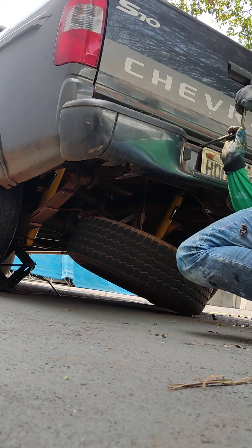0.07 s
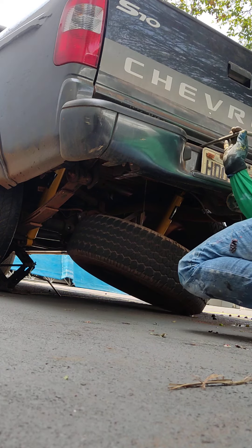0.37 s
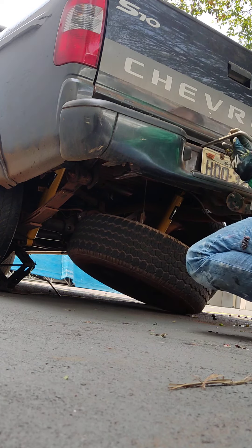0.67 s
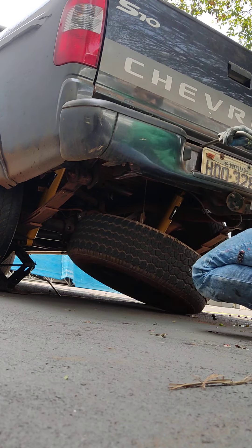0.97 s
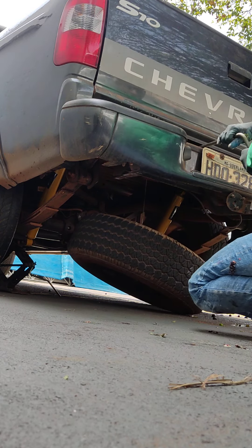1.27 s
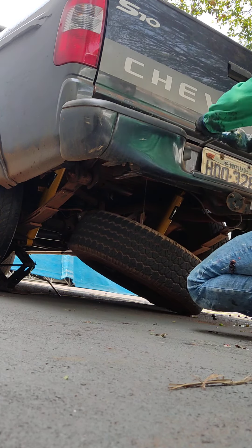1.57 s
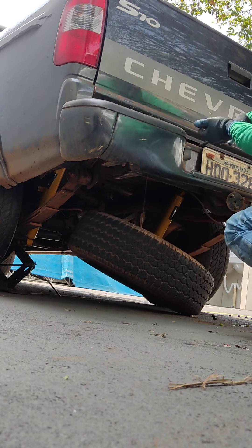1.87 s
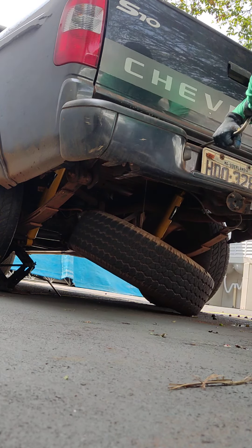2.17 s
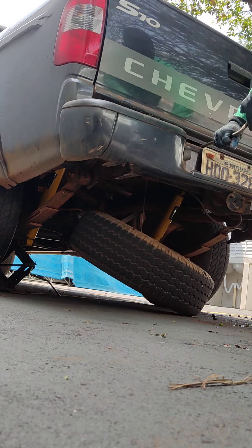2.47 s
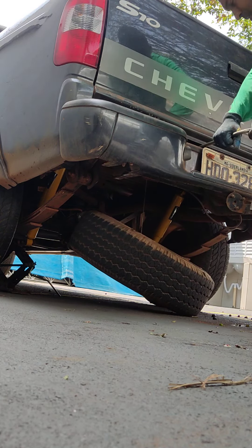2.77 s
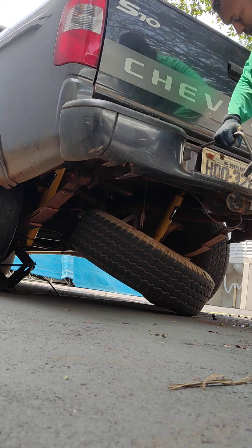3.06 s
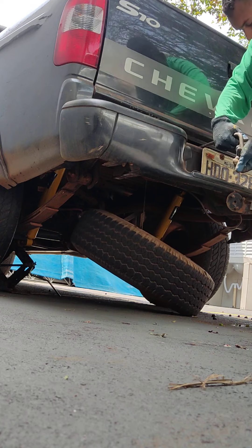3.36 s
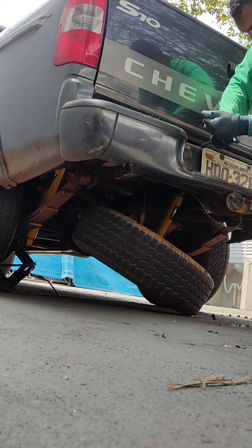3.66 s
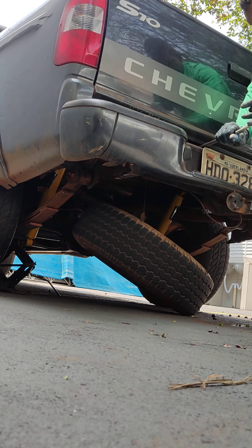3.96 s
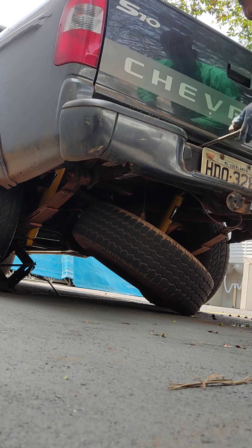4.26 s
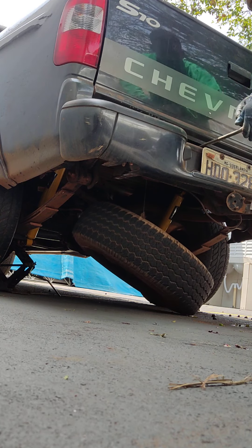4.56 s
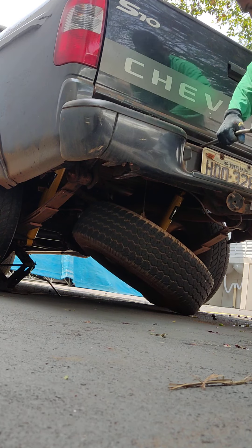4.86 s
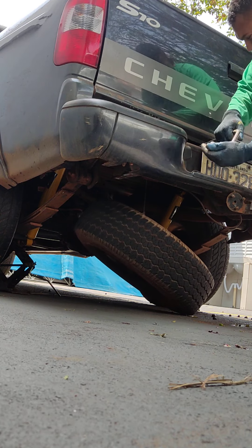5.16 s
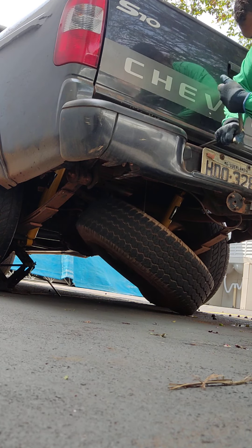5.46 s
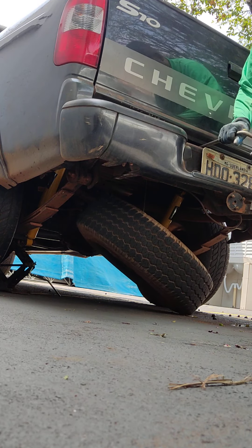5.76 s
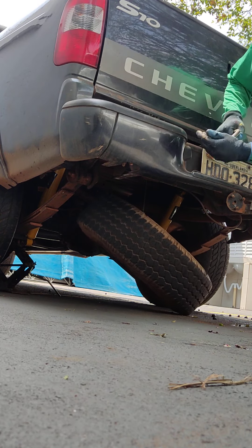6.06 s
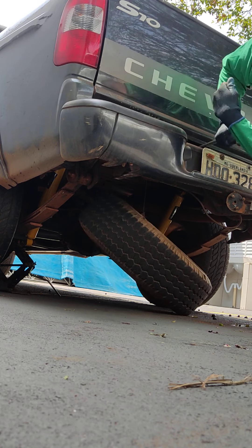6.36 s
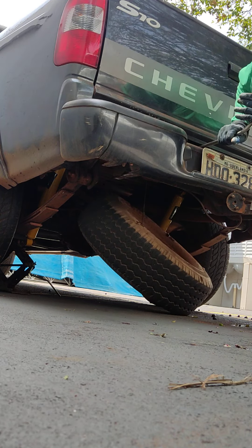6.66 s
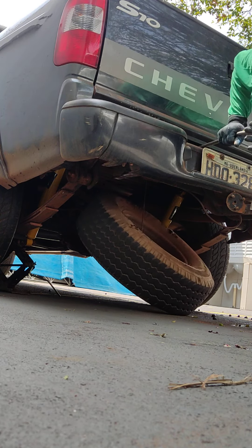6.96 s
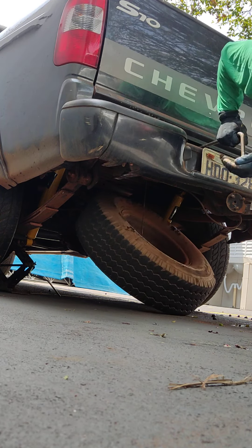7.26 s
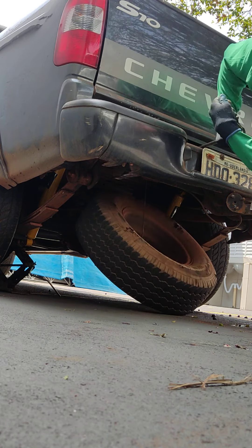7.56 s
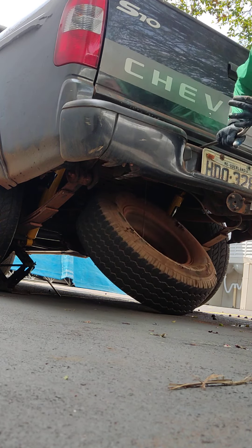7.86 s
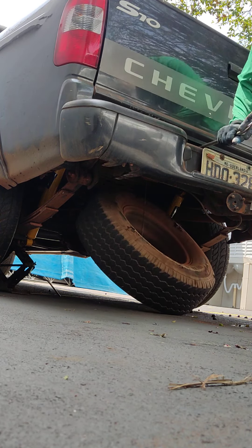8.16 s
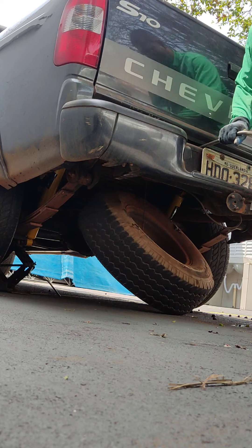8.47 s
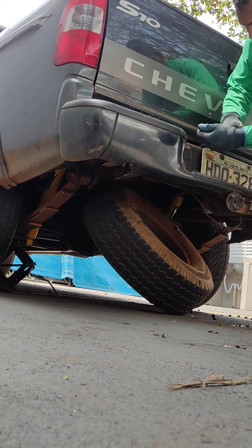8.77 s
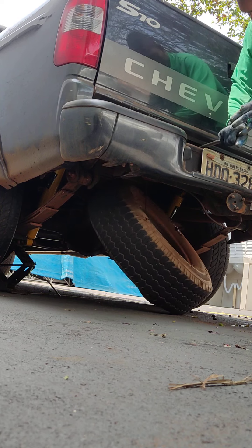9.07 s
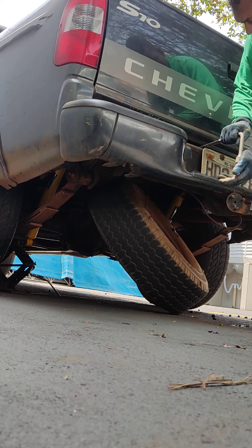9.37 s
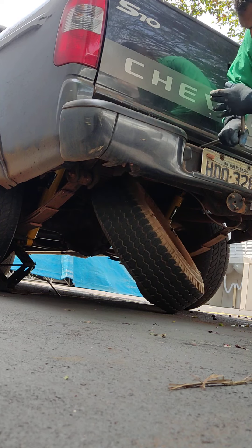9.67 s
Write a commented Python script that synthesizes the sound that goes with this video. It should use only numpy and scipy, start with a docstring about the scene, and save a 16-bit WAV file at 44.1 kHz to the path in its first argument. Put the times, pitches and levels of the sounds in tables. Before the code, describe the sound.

A steady low hum, a faint wavering drone and distant traffic run throughout, outdoors by a pickup's tailgate. A steel rod cranks the spare tyre winch, with soft tyre dragging and glove rustle underneath. After a few light clicks, a booming knock lands at 1.2 seconds, then a cluster of ringing metal knocks and wheel bumps rattles the chassis until 2.7, sharpest at 1.75, with a short squeak near 2.4. Small clinks follow around 3 to 3.8 seconds, and brief scuffs come at 3.4 and 5.3. More knocks fall at about 5.6, 6.1, 6.5 and 7.5 seconds, with occasional faint squeaks. Two dry snaps sound close on the left at 5.9 and 8.2, the first louder. Links tinkle quickly around 8 seconds, a heavy booming knock comes at 8.75, and light clicks and a dull wheel thump follow near 9.5.

```python
"""A long steel rod cranks the spare-tyre winch under a pickup, heard outdoors from the tailgate.
The rod knocks, rings and squeaks in its socket; the blows rattle the chassis and boom in the underbody.
Small links click, the wheel drags and bumps as it is hoisted, gloves rustle and twice something scuffs.
Two dry snaps fall close to the left port of the stereo microphone.
Behind lie a steady hum, a wavering engine-like drone, a faint low boom and a quiet street."""
import sys
import numpy as np
from scipy import signal
from scipy.fft import rfft, irfft, next_fast_len
from scipy.io import wavfile

SR = 44100
rng = np.random.default_rng(int(sys.argv[2]) if len(sys.argv) > 2 else 0)


def unload_audio(sound):
    """Save the sound as a 16-bit wav file, at the path given as the first command line argument."""
    columns = np.transpose(np.atleast_2d(sound))
    # keep every value between -1 and 1, then stretch to whole-number steps
    steps = np.round(np.clip(columns, -1, 1) * 32767)
    wavfile.write(sys.argv[1], SR, steps.astype(np.int16))


N = 432621
TIME = np.arange(N) / SR

# likeness of the two microphone ports: (frequency [Hz], coherence [0-1])
PORT_COHERENCE = [(25, .99), (60, .998), (190, .997), (310, .97), (640, .55), (1400, 0), (15000, 0)]
# where the truck sits in the stereo image: (frequency [Hz], left over right [dB])
TRUCK_BALANCE = [(160, 0), (330, 0.8), (600, 10), (1100, 3.5), (2100, -7), (4200, -8), (9000, 2)]
# street air and the low rumble of far traffic, each: (frequency [Hz], relative level [dB])
STREET_SPECTRUM = [(12, -31), (20, -26), (43, 8), (75, 6.5), (102, -2.5), (123, -7), (145, -24), (172, -14),
                   (282, -19.5), (644, -26.5), (781, -29.5), (1510, -37), (8360, -57), (10700, -29.5),
                   (14500, -55)]
RUMBLE_SPECTRUM = [(18, 5.5), (28, 6.5), (38, 9), (50, 8), (58, 9.5), (72, 1.5), (95, -4), (115, 0.5),
                   (160, -4), (300, -36)]
# low drone, boom and hum: (frequency [Hz], steady level [dB], waver [share of the steady part])
BACKGROUND_TONES = [(58.3, -54.5, 0.83), (95.6, -57.5, 0.41), (119.85, -38.5, 0.061)]
# effort at the crank, used about its mean: (time [s], load [dB], hand movement [dB])
CRANK_EFFORT = [(0.0, -55, -67), (0.55, -52, -61.5), (1.09, -54, -65.5), (1.42, -46, -58.5),
                (1.61, -49, -61.5), (2.32, -45, -60.5), (2.62, -49, -63), (3.17, -51.5, -60),
                (4.01, -49, -61), (4.56, -54.5, -60.5), (4.83, -53, -64), (5.46, -44, -56.5),
                (5.63, -48, -60.5), (7.13, -55, -64.5), (7.7, -45, -59.5), (7.9, -48, -62),
                (8.09, -55.5, -67.5), (8.41, -53, -61.5), (8.93, -46, -61), (9.1, -50, -63.5),
                (9.48, -49, -59.5), (9.81, -45.5, -57.5)]
# dragging tyre, gloves and scuffs, each: (frequency [Hz], relative level [dB])
DRAG_SPECTRUM = [(82, -64), (140, -4.5), (198, -2.5), (302, -6.5), (339, -11), (473, -13.5), (511, -12),
                 (574, -19), (811, -17), (1390, -26.5), (3000, -37), (3900, -41), (6600, -120)]
GLOVE_SPECTRUM = [(800, -7), (1500, -0.5), (3500, -0.5), (6000, -3.5), (10500, -5), (14000, -18.5)]
SCUFF_SPECTRUM = [(210, -23), (350, -8), (525, -6), (949, -5), (1070, -11), (2100, -7), (3050, -12.5),
                  (3620, -6.5), (4170, -14.5), (4800, -9.5), (11100, -18), (14500, -28)]
# scuffing strokes: (start [s], full [s], easing [s], end [s], level [dB])
SCUFF_STROKES = [(3.342, 3.379, 3.415, 3.468, -37.5), (5.252, 5.263, 5.28, 5.31, -44),
                 (5.265, 5.318, 5.4, 5.436, -37)]
# resonances of the scuffs and of the steel frame, each: (frequency [Hz], Q, added peak [dB])
SCUFF_RESONANCES = [(727, 14, 0), (935, 13, -1), (1280, 22, 4), (2290, 16, -2), (3650, 20, -6)]
CHASSIS_RESONANCES = [(410, 12, -6.5), (780, 18, 0), (1090, 3.2, -3), (2140, 3.2, -1.5), (2450, 16, -2),
                      (3580, 14, -2), (5100, 20, -8), (6760, 23, -1.5)]
# snaps at the left port: (time [s], level [dB], ring [Hz], relative level of the dull part [dB])
DRY_SNAPS = [(5.8847, -14.5, 8930, -26), (8.2428, -22.5, 9600, 1.5)]
# squeaks of the turning rod: (start [s], loudest [s], end [s], level [dB], pitch [Hz])
ROD_SQUEAKS = [(2.355, 2.4, 2.445, -46, 1000), (5.692, 5.783, 5.84, -54, 980),
               (7.74, 7.774, 7.84, -57, 3800), (8.98, 9.03, 9.1, -58, 2250)]
# decay of the chassis rattle: (frequency [Hz], base t60 [s])
RATTLE_DECAY = [(150, 0.89), (300, 0.47), (600, 0.33), (1200, 0.2), (2500, 0.22), (5000, 0.19),
                (12000, 0.23)]
# modes of the underbody panels and of the links, each: (frequency [Hz], relative level [dB], t60 [s])
PANEL_MODES = [(160, -3, .3), (183, -2, .3), (214, -1, .26), (266, 1, .28), (314, 1, .25), (402, -3, .2),
               (505, -8, .18)]
LINK_MODES = [(2720, -2.5, 0.088), (2890, -3, 0.083), (3420, -3.5, 0.1), (3520, 1, 0.068),
              (3800, -4, 0.071), (4000, -39, .11), (4730, -4, 0.17), (6070, 0, 0.08), (8660, -10, 0.055)]
# bumps of the swinging wheel: (time [s], strength [dB], boom [dB], answering panel [Hz])
WHEEL_BUMPS = [(0.42, -43, -50, 208), (1.240, -29.5, -26, 238.5), (1.319, -37.5, -20, 242),
               (2.213, -33.5, -39, 214), (2.358, -37.5, -45, 476), (2.433, -40, -20, 272),
               (2.467, -42, -42, 423), (2.706, -36, -23.5, 283), (3.857, -31.5, -48, 193),
               (4.139, -44, -45, 184), (4.876, -44.5, -43, 338), (4.975, -34.5, -43, 190),
               (5.79, -32, -41, 191), (7.664, -36, -51, 168), (7.718, -35.5, -48, 195),
               (9.04, -39, -55, 259), (9.478, -35.5, -24, 195)]
# light clicks of rod and links: (time [s], strength [dB], favoured pitch [Hz])
LINK_CLICKS = [(0.4535, -49, 2970), (0.5536, -48, 2880), (2.825, -47, 3000), (3.0155, -43, 3520),
               (3.0729, -49, 2930), (3.2315, -49.5, 3780), (3.2795, -41, 3740), (3.7886, -40.5, 3280),
               (4.823, -52, 4550), (5.5, -47, 3980), (5.6534, -47, 6600), (7.904, -40.5, 2830),
               (7.9574, -43, 3000), (8.0184, -41, 2840), (8.081, -48, 2760), (9.1086, -50, 5100),
               (9.3094, -51.5, 6900), (9.502, -49, 3900)]
# modes of the steel rod: (frequency [Hz], relative level [dB], t60 [s], left over right [dB])
ROD_MODES = [(664, 0, .34, 3), (970, -10, .12, 3), (1034, -9, .14, 3), (1090, 0, .17, 4),
             (1184, -3, .12, 3), (1270, -9, .09, 1), (1385, -13, .14, -1), (1480, -12, .12, -2),
             (2036, -4, .12, -3), (2075, -8, .08, -2), (2156, 2, .15, -2), (2530, -10, .14, -5),
             (3050, -15, .06, -4), (3640, -14, .14, -4), (3780, -11, .1, -4), (3870, -9, .08, -4),
             (5230, -14, .12, -3), (6180, -12, .12, -2), (6970, -14, .1, -2)]
# first tick of a knock: (frequency [Hz], relative level [dB])
TICK_SPECTRUM = [(600, -17), (1300, 12), (2300, -9), (3800, 1), (6000, 5), (9000, -27), (14000, -14)]
# knocks in the socket, by the strength of each part:
# (time [s], steel [dB], ring [dB], crack [dB], body [dB], boom [dB], favoured pitch [Hz])
ROD_KNOCKS = [(1.2295, -40.5, -38, -44, -36, -42, 3140), (1.2388, -43, -37, -52, -34, -15.5, 1120),
              (1.6857, -41.5, -39, -59, -38.5, -44, 970), (1.7520, -28, -27, -31, -37.5, -17, 2150),
              (1.9615, -35.5, -40, -46, -34.5, -23.5, 1140),
              (2.1689, -38.5, -42.5, -37.5, -43.5, -49, 2470), (2.355, -66, -43, -66, -36.5, -23, 970),
              (2.4662, -56, -61, -50, -49, -35, 1100), (3.2785, -53, -37, -47.5, -48.5, -48, 1280),
              (4.591, -50, -49, -57, -46, -49, 910), (5.5733, -44.5, -42, -55, -38.5, -29, 960),
              (6.105, -35.5, -30, -44, -40.5, -23.5, 1090), (6.501, -41.5, -49, -42.5, -32, -25, 2240),
              (7.1287, -45, -41, -51, -52, -47, 1400), (7.4903, -36.5, -46, -43.5, -43.5, -23.5, 2000),
              (8.752, -35.5, -36, -47.5, -36.5, -13.5, 840)]


def from_db(db):
    """Decibels to gain."""
    return 10 ** (np.asarray(db) / 20)


def unit_rms(x):
    """Scale to unit rms."""
    return x / np.sqrt(np.mean(x ** 2) + 1e-20)


def at_hz(points, hz):
    """Read a table on a log-frequency axis."""
    frequencies, values = np.transpose(points)
    return np.interp(np.log(np.maximum(hz, 1)), np.log(frequencies), values)


def panned(db):
    """Left and right gains of equal total power for a level difference."""
    gains = from_db(np.array([[.5], [-.5]]) * db)
    return gains / np.sqrt(np.mean(gains ** 2, axis=0))


def drift(rate_hz):
    """Smooth random wander of unit rms."""
    pole = np.exp(-80 * np.pi * rate_hz / SR)
    slow = signal.lfilter([1], [1, -2 * pole, pole * pole], rng.standard_normal(N // 40 + 2002))[2000:]
    return np.interp(np.arange(N) / 40, np.arange(len(slow)), unit_rms(slow))


def impulses(times, heights):
    """One sample per contact."""
    out = np.full(N, 1e-18)
    np.add.at(out, np.round(np.asarray(times) * SR).astype(int), heights)
    return out


def ring(blows, hz, t60):
    """A unit impulse sets a sine of height 1 ringing."""
    decay, angle = from_db(-60 / (t60 * SR)), 2 * np.pi * hz / SR
    return signal.lfilter([0, np.sin(angle)], [1, -2 * decay * np.cos(angle), decay * decay], blows)


def struck_mode(times, db, hz, t60, spread_db):
    """One mode, struck with a slightly different strength each time."""
    return ring(impulses(times, from_db(db + rng.normal(0, spread_db, len(times)))), hz, t60)


def mode_loss(hz, favoured_hz, db_per_octave, most_db):
    """Decibels lost by a mode far from the pitch that a contact favours."""
    return np.minimum(db_per_octave * np.abs(np.log2(hz / favoured_hz)), most_db)


def resonate(x, peaks):
    """Add resonant peaks to a sound."""
    return x + sum(from_db(db) * signal.lfilter(*signal.iirpeak(hz, q, fs=SR), x) for hz, q, db in peaks)


def noise(spectrum, side=0.0):
    """Stereo noise, alike at both ports in the bass only; side leans it towards the truck."""
    size = next_fast_len(N)
    hz = np.arange(size // 2 + 1) * SR / size
    common, apart = rfft(rng.standard_normal((2, size)))
    alike = np.clip(at_hz(PORT_COHERENCE, hz), 0, 1)
    pair = np.sqrt(1 + alike) * common + np.sqrt(1 - alike) * apart * [[1], [-1]]
    gains = from_db(at_hz(spectrum, hz)) * panned(side * at_hz(TRUCK_BALANCE, hz)) * (hz > 12)
    return unit_rms(irfft(pair * gains, size)[:, :N])


def street():
    """Street air and the rumble of far traffic, well behind the truck."""
    return from_db(-46) * noise(STREET_SPECTRUM) + from_db(-42.5) * noise(RUMBLE_SPECTRUM)


def background_tones():
    """A steady hum near 120 Hz, a wavering engine-like drone and a faint low boom."""
    tones = 0
    for hz, db, waver in BACKGROUND_TONES:
        wander = 1 + waver * (drift(2.7) + 1j * drift(1.5))  # in both level and phase
        tones += np.sqrt(2) * from_db(db) * np.real(wander * np.exp(2j * np.pi * hz * TIME))
    return tones


def effort():
    """Load on the crank and movement of the hands, each in dB about its mean."""
    times, *columns = np.transpose(CRANK_EFFORT)
    return [np.interp(TIME, times, db - db.mean()) for db in columns]


def drag_and_gloves():
    """Rubber drags on asphalt and cloth rustles, both swelling with the effort."""
    load, hands = effort()
    drag = from_db(-49.5 + 0.76 * load + 2.0 * drift(9.3)) * noise(DRAG_SPECTRUM, side=0.39)
    rustle = from_db(-61 + 1.4 * hands + 2.15 * drift(12.0)) * noise(GLOVE_SPECTRUM, side=0.69)
    return drag + rustle


def scuffs():
    """Broad strokes of fine-grained friction."""
    strokes = sum(from_db(db) * np.interp(TIME, np.sort(corners), [0, 1, 1, 0])
                  for *corners, db in SCUFF_STROKES)
    grit = from_db(1.35 * drift(250)) * noise(SCUFF_SPECTRUM, side=0.86)
    return strokes * unit_rms(resonate(grit, SCUFF_RESONANCES))


def snaps():
    """Tiny dry snaps close to the left port, over in a few milliseconds."""
    out = 0
    for time, db, hz, dull_db in DRY_SNAPS:
        click = impulses([time], [from_db(db)])
        edge = np.diff(click, prepend=0)
        out += 0.96 * ring(edge, hz, 0.0017) + 0.44 * ring(edge, 10550, 0.0048)
        out += from_db(dull_db) * ring(click, 2200, 0.00083)
    return out * from_db([[0], [-29]])


def squeaks():
    """Steel slides on steel and holds one thin, unsteady note at a time."""
    friction = rng.standard_normal((2, N))
    out = 0
    for *corners, db, hz in ROD_SQUEAKS:
        note = unit_rms(signal.lfilter(*signal.iirpeak(hz, Q=20, fs=SR), friction))
        out += from_db(db) * np.interp(TIME, np.sort(corners), [0, 1, 0]) * note
    return out


def rattle_bands():
    """Countless chassis modes as half-octave bands of noise: (centre [Hz], band)."""
    edges = 150 * 2 ** np.arange(0, 7, .5)
    white = [noise([(20, 0), (20000, 0)], side=1) for _ in range(2)]
    bands = []
    for k, (low, high) in enumerate(zip(edges, edges[1:])):
        bandpass = signal.butter(2, [low, high], "band", fs=SR, output="sos")
        bands.append((np.sqrt(low * high), unit_rms(signal.sosfilt(bandpass, white[k % 2]))))
    return bands


def rattle(bands, times, spectra, rise_cycles, rise_s, t60_scale):
    """Each blow spreads through the chassis modes: the bands swell, lows last, and die away."""
    out = np.zeros((2, N))
    for hz, band in bands:
        blows = impulses(times, [from_db(at_hz(spectrum, hz)) ** 2 for spectrum in spectra])
        fall = from_db(-120 / (t60_scale * at_hz(RATTLE_DECAY, hz) * SR))
        swell = np.exp(-1 / (SR * (rise_s + rise_cycles / hz)))
        energy = signal.lfilter([1 - swell], [1, -fall - swell, fall * swell], blows)
        out += band * np.sqrt(np.abs(energy))
    return out


def chassis(x):
    """The steel frame favours a few bands."""
    return 0.61 * resonate(x, CHASSIS_RESONANCES)


def underbody(times, panel_db, boom_db, boom_hz=95.5):
    """Panels ring with new strengths at every blow, above the boom of the hanging wheel."""
    shape = len(times), len(PANEL_MODES)
    shares = from_db(rng.normal(0, 1.1, shape)) * rng.choice([-1, 1], shape)
    panels = sum(ring(impulses(times, from_db(panel_db + db) * shares[:, k]), hz, t60)
                 for k, (hz, db, t60) in enumerate(PANEL_MODES))
    blows = impulses(times, from_db(boom_db))
    # the heavy wheel takes a few cycles to get moving
    return panels + ring(blows, boom_hz, t60=0.25) - ring(blows, boom_hz, t60=0.088)


def wheel_bumps(bands, lurch_delay_s=0.024, lurch_hz=304.6):
    """Soft, heavy contacts of the wheel reach mainly the low modes; it lurches after every knock."""
    lurches = [(time + lurch_delay_s, body - 4, boom - 12, lurch_hz)
               for time, *_, body, boom, _ in ROD_KNOCKS]
    times, level, boom, panel_hz = np.vstack([WHEEL_BUMPS, lurches]).T
    spectra = [[(180, db - 14), (350, db - 13), (800, db - 16), (1600, db - 28), (5000, db - 42)]
               for db in level]
    frame = chassis(rattle(bands, times, spectra, rise_cycles=5.5, rise_s=0.0009, t60_scale=0.65))
    answer = 0
    for hz in np.unique(panel_hz):
        hits = panel_hz == hz
        answer += ring(impulses(times[hits], from_db(level[hits] + 1.5)), hz, t60=0.19)
    return frame + answer + underbody(times, level - 12.5, boom - 2)


def link_clicks(bands, stray_count=14, stray_db=-59, fizz_hz=3400):
    """Light steel contacts with no weight behind them; faint strays are likelier under load."""
    when, size, octaves = rng.random((stray_count, 3)).T
    load, _ = effort()
    work = np.cumsum(from_db(load))
    stray_times = np.interp(when, work / work[-1], TIME)
    strays = np.transpose([stray_times, stray_db + 0.5 - size, fizz_hz * 2 ** octaves])
    times, level, favoured = np.vstack([LINK_CLICKS, strays]).T
    fizz_db = level - 3.5 + 6 * np.log2(favoured / fizz_hz)  # higher clicks carry more fizz
    spectra = [[(300, db - 25), (1500, db - 20), (2900, db - 11), (5000, db - 12),
                (7500, fizz - 6), (13000, fizz - 6)] for db, fizz in zip(level, fizz_db)]
    tinkle = np.zeros((2, N))
    for port in tinkle:  # each port catches the modes with strengths of its own
        for hz, db, t60 in LINK_MODES:
            strength = level + db - 4.5 - mode_loss(hz, favoured, db_per_octave=38, most_db=14)
            port += struck_mode(times, strength, hz, t60, spread_db=2.5)
    frame = rattle(bands, times, spectra, rise_cycles=1.3, rise_s=0.00027, t60_scale=1)
    return frame + panned(3.5) * tinkle


def rod_ring(times, level, favoured, softness_db, left_delay_s=0.00009):
    """A hard knock wakes every mode of the rod; a softer one narrows the ring to its favoured pitch."""
    rod = 0
    for k, (hz, db, t60, side_db) in enumerate(ROD_MODES):
        strength = level + db - mode_loss(hz, favoured, db_per_octave=2.17 * softness_db, most_db=26)
        # neighbouring modes start in opposite directions
        rod += (-1) ** k * panned(side_db) * struck_mode(times, strength, hz, t60, spread_db=1.64)
    left, right = rod
    return np.array([np.interp(TIME - left_delay_s, TIME, left), right])  # the right port is nearer


def rod_knocks(bands, hard_db=-27.5, tick_t60_s=0.019, panel_delay_s=0.00517):
    """The rod slips in its socket: it ticks and rings, and the blow runs into chassis and panels."""
    times, steel, ringing, crack, body, boom, favoured = np.transpose(ROD_KNOCKS)
    softness_db = np.maximum(hard_db - steel, 0)
    spectra = [[(170, low - 7), (330, low - 3), (700, low - 7),
                (1150, mid - 9), (1500, mid - 12), (2200, mid - 9),
                (3600, high - 5), (7000, high - 6), (13000, high - 8)]
               for low, mid, high in zip(body, steel, crack)]
    frame = chassis(rattle(bands, times, spectra, rise_cycles=1.4, rise_s=0.00023, t60_scale=0.87))
    tick_blows = impulses(times, from_db(crack + 4.5 - 0.97 * softness_db))
    tick_envelope = signal.lfilter([1], [1, -from_db(-60 / (tick_t60_s * SR))], tick_blows)
    tick = tick_envelope * noise(TICK_SPECTRUM, side=1)
    rod = rod_ring(times, ringing, favoured, softness_db)
    return frame + tick + rod + underbody(times + panel_delay_s, body - 9, boom - 1)


def scene():
    """The winch as heard from the tailgate, with low tones and the street behind."""
    bands = rattle_bands()
    winch = rod_knocks(bands) + link_clicks(bands) + wheel_bumps(bands) + squeaks()
    return winch + snaps() + drag_and_gloves() + scuffs() + background_tones() + street()


def record(dry, port_hz=13060, cutoff_hz=14300):
    """The microphone ports roll off the top octave; above that the sound is cut steeply."""
    ported = signal.sosfilt(signal.butter(3, port_hz, fs=SR, output="sos"), dry)
    return signal.sosfilt(signal.ellip(10, .2, 70, cutoff_hz, fs=SR, output="sos"), ported)


dry = scene()
out = record(dry)
unload_audio(out)
```